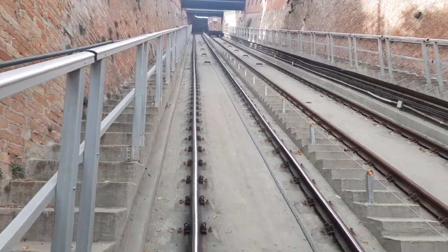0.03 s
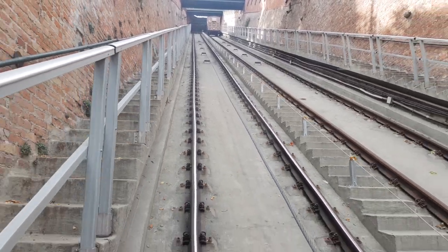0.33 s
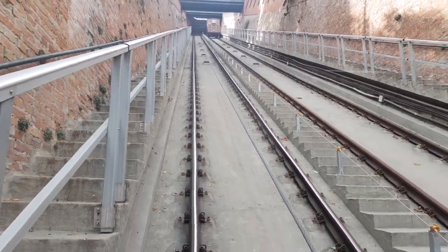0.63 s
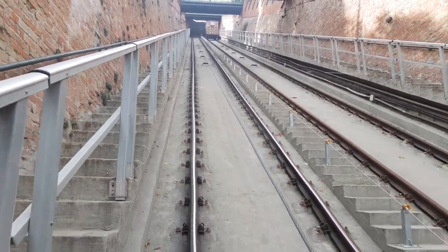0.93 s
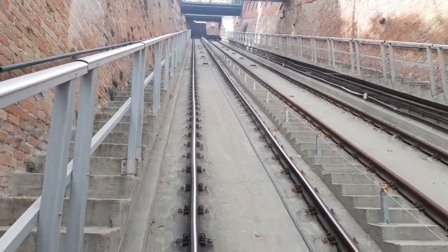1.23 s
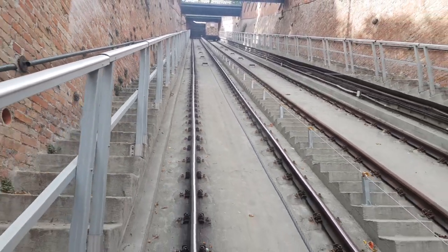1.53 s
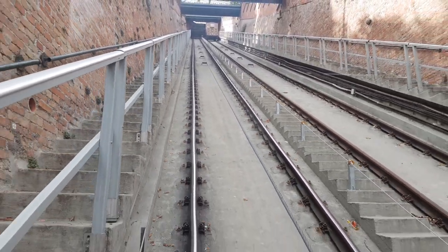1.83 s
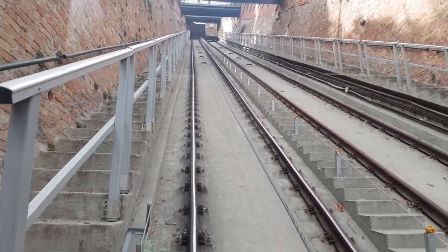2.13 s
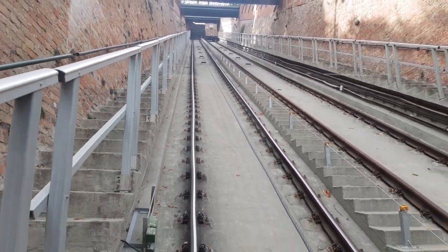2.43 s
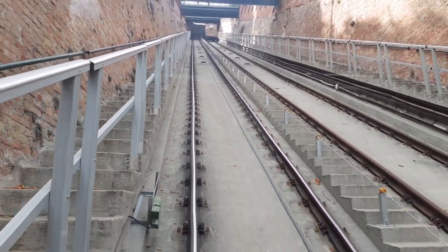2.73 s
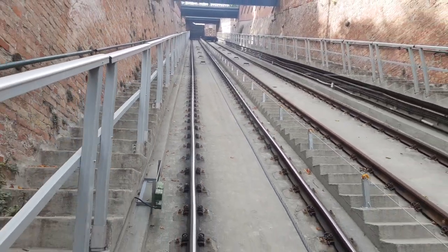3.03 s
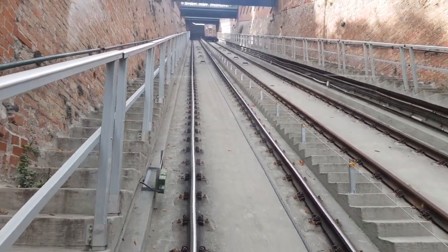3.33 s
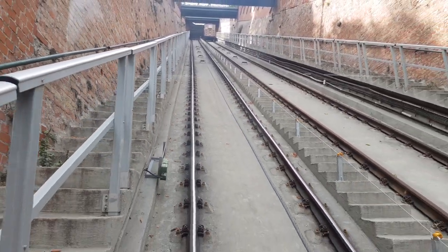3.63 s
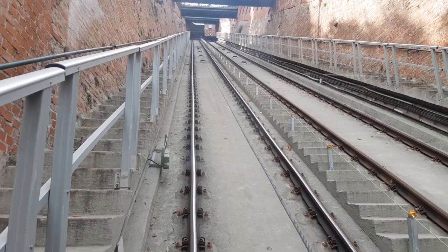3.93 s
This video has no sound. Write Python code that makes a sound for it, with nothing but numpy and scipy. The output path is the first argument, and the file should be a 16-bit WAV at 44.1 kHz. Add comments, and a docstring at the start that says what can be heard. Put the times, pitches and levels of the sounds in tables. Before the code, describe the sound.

Heard from the front of a funicular car climbing outdoors, a low rolling rumble carries on under a faint whine and wheel rush. Bumps, knocks and light scuffs bunch up early, ease, then return, with tiny ticks of grit.

```python
"""A funicular car rolls steadily up an open brick cutting, heard from its front.
From the start, uneven rail makes the body boom under a rush of rolling steel and a faint machine whine.
Bumps thump and rail joints knock, clustering near 0.5 s with light scuffs and a tick of grit.
The boom eases after 1 s; grit ticks near 1.7 s. A second cluster of knocks, thumps and scuffs
comes near 2.5 s, and a last few thumps after 3.4 s."""
import sys
import numpy as np
from scipy import signal
from scipy.fft import rfft, irfft
from scipy.io import wavfile

SR = 44100
rng = np.random.default_rng(int(sys.argv[2]) if len(sys.argv) > 2 else 0)


def int16_out(signal):
    """Quantize to a 16-bit WAV file."""
    q = np.round(np.clip(np.atleast_2d(signal).T, -1, 1) * 32767)
    wavfile.write(sys.argv[1], SR, q.astype(np.int16))


N = 176400
T, HZ = np.arange(N) / SR, np.fft.rfftfreq(N, 1 / SR)

# Car body resonances. Each row: centre in Hz, width in Hz, relative level in dB.
BODY_MODES = [(61, 11, -6), (84.3, 12, -1), (94.8, 12, -6), (119, 12, -4), (148.1, 38, -4),
              (174.2, 14.4, -7), (198, 30, -15.5), (241.6, 16.6, -20), (302.7, 29, -20.5)]
# Rumble under the resonances. Each row: frequency in Hz, relative density in dB.
RUMBLE_SPECTRUM = [(12, -50), (28, -17), (42, -1), (60, 10.5), (110, 4.5), (170, -1.5), (230, -11.5),
                   (340, -22), (600, -66.5)]
# Track shaking the body. Each row: time in seconds, deep boom level in dB, upper boom level in dB.
BOOM_LEVELS = [(0.0, -22, -25), (0.13, -14.5, -19.5), (0.21, -24, -28), (0.3, -20, -24.5),
               (0.35, -25.5, -26.5), (0.45, -15, -20.5), (0.5, -15, -25.5), (0.6, -15, -22.5),
               (0.73, -22.5, -26), (0.86, -19.5, -25.5), (0.96, -19, -29), (1.01, -27, -30),
               (1.1, -22.5, -23.5), (1.15, -25.5, -28.5), (1.23, -24.5, -23), (1.5, -27.5, -27),
               (1.7, -26, -29.5), (1.76, -20.5, -23), (1.85, -24, -22.5), (1.98, -15.5, -23.5),
               (2.11, -24, -31), (2.22, -21.5, -25.5), (2.33, -27.5, -31), (2.38, -20, -24),
               (2.43, -18, -21), (2.465, -22, -22.5), (2.54, -13.5, -24.5), (2.59, -21, -28.5),
               (2.8, -23, -23), (3.05, -19.5, -28), (3.33, -21, -27.5), (3.39, -27.5, -30),
               (3.43, -18, -22.5), (3.48, -17.5, -32), (3.54, -22, -24.5), (3.63, -23, -23),
               (3.7, -20.5, -33), (3.76, -19, -26), (3.82, -24, -30.5), (3.98, -21, -25.5)]
# Wheel rush. Each row: frequency in Hz, left and right relative density in dB.
RUSH_SPECTRUM = [(100, -58.5, -60), (250, -59.5, -65.5), (353, -66.5, -70.5), (463, -62.5, -67.5),
                 (554, -61.5, -61), (600, -64.5, -67), (708, -68.5, -67.5), (933, -72, -75),
                 (1020, -66.5, -74.5), (1160, -70.5, -74.5), (1330, -74.5, -74), (1620, -71, -77),
                 (1740, -78, -73), (1860, -73.5, -75.5), (2260, -78, -76.5), (2800, -83, -82),
                 (4060, -88, -90.5), (5200, -92.5, -94.5), (6200, -94, -99), (7140, -97, -107),
                 (7940, -103.5, -114), (10300, -103.5, -106), (11600, -107, -100.5), (15500, -110, -108)]
# Likeness of the rush's two sides. Each row: frequency in Hz, correlation from -1 to 1.
RUSH_CORRELATION = [(150, 0), (300, 0.63), (430, 0.6), (560, 0.58), (700, 0.7), (830, .25), (980, 0.7),
                    (1150, -.1), (1600, -.45), (2000, 0), (3000, 0), (15000, 0.05)]
# Rush below the hiss band. Each row: time in seconds, gain in dB.
RUSH_GAIN = [(0, 2), (.5, 1), (.72, -0.5), (.9, 0.9), (1.1, -0.5), (1.55, -1), (1.9, 0.5), (2.25, -.8),
             (2.5, 1), (2.9, 0), (3.35, 0), (3.65, 0.7), (4, -0.4)]
# Hiss at the top of the rush. Each row: time in seconds, gain in dB.
HISS_GAIN = [(0, 1.5), (.36, -0.5), (.56, 1), (.75, -1), (.92, 1), (1.2, -2), (1.6, -2.3), (1.8, .3),
             (1.96, -0.5), (2.25, -1.5), (2.46, .3), (2.8, -1), (3.45, -1.2), (3.6, -.5), (4, 0.5)]
# Machine tones. Each row: pitch in Hz, left and right level in dB, right lag in cycles, rms waver in Hz.
WHINE_TONES = [(348.5, -45, -51.5, 0.067, 0.51), (543.2, -46.5, -47.8, 0, 2.68),
               (704.5, -52.5, -52.5, 0, 6), (965, -56, -63, -0.041, 4.98), (1045, -52, -56, -0.38, 1.4),
               (1251, -53.5, -58.5, -0.21, 0.92), (1908, -64.5, -60.5, .3, 9.3),
               (2160, -63.5, -71.5, 0.29, 2.2), (2320, -62.5, -62, 0.56, 3.6)]
# Swell of the whine. Each row: time in seconds, gain in dB.
WHINE_GAIN = [(0, 2.5), (.6, 2.5), (1.3, 2.5), (1.75, -0.5), (2.3, -1), (2.8, 2.5), (3.3, 1.5), (3.75, 1),
              (4, 2.5)]
# Running gear scuffs. Each row: start in seconds, level in dB, centre in Hz, width in octaves,
# rise in seconds, 60 dB decay in seconds.
GEAR_SCUFFS = [(0.025, -48, 1905, 0.013, 0.19, 1.2), (.405, -34, 700, 0.16, 0.04, .35),
               (.4, -41, 980, 0.26, 0.036, 0.29), (.83, -41, 800, 0.35, 0.048, 0.32),
               (2.42, -68, 11000, .2, 0.15, .3), (2.572, -49, 4000, 0.28, .012, 0.2),
               (2.666, -48, 3400, 0.54, 0.0073, 0.1), (2.565, -31.5, 666, 0.0054, 0.022, 0.31)]
# Wheels at rail joints. Each row: start in seconds, level in dB, 60 dB decay in seconds.
JOINT_KNOCKS = [(0.046, -25, 0.2), (0.41, -25, 0.091), (0.444, -22, .12), (.62, -30.5, .25),
                (1.74, -23.5, 0.11), (2.403, -18.5, 0.082), (2.489, -20.5, 0.12), (2.521, -26.5, 0.12)]
# Colour of a knock. Each row: frequency in Hz, relative density in dB.
KNOCK_SPECTRUM = [(60, -14), (130, -2), (190, 7.5), (250, 6.5), (310, -5), (390, -18), (700, -24.5),
                  (1500, -40), (4000, -70)]
# Wheels at bumps. Each row: crest time in seconds, peak level in dB, pitch in Hz.
BUMP_THUMPS = [(.087, -9, 100), (0.13, -9.5, 106), (0.169, -12, 93), (.317, -16, 115), (0.417, -14, 93),
               (0.473, -5.5, 89), (0.521, -13, 109), (0.567, -5.5, 90), (0.605, -6.5, 99), (.635, -12, 97),
               (0.669, -10.5, 109), (1.124, -11.5, 95), (1.214, -10.5, 130), (1.331, -15.5, 119),
               (1.791, -9.5, 101), (1.954, -11, 101), (2.212, -13, 108), (2.423, -8.5, 121),
               (2.539, -5, 94), (2.565, -9, 96.4), (2.723, -12, 112), (2.774, -10.5, 116),
               (2.846, -12, 118), (2.891, -16, 109), (2.942, -11.5, 109), (3.478, -10.5, 102),
               (3.588, -10, 107), (3.635, -10, 102), (3.746, -9, 93)]
# Grit on the rail. Each row: start in seconds, level in dB, centre in Hz, 60 dB decay in seconds.
GRIT_TICKS = [(.552, -58, 10500, 0.082), (1.6245, -55.5, 11000, .034), (1.685, -61, 11500, .04),
              (1.736, -50.7, 11500, .027), (2.316, -59, 13100, .07), (2.668, -61, 10800, .09)]


def amp(db):
    """Decibels to gain."""
    return 10 ** (np.asarray(db) / 20)


def unit(x):
    """Scale to rms 1."""
    return x / np.sqrt(np.mean(x ** 2) + 1e-30)


def over_time(rows, column=1):
    """Table column interpolated over time."""
    table = np.transpose(rows)
    return np.interp(T, table[0], table[column])


def over_pitch(rows, column=1):
    """Table column interpolated over log frequency."""
    table = np.transpose(rows)
    return np.interp(np.log(HZ + 1), np.log(table[0] + 1), table[column])


def noise(spectrum):
    """Shaped noise, rms 1."""
    return unit(irfft(rfft(rng.standard_normal(N)) * spectrum, N))


def drift(rate_hz):
    """Slow random wander, rms 1."""
    return noise(np.exp(-(HZ / rate_hz) ** 2))


def band(centre_hz, octaves):
    """Bell-shaped spectrum."""
    return np.exp(-.5 * (np.log2((HZ + 1) / centre_hz) / octaves) ** 2)


def burst(start_s, rise_s, t60_s):
    """Linear rise, exponential decay."""
    age_s = T - start_s
    return np.clip(age_s / rise_s, 0, 1) * amp(-60 * np.maximum(age_s - rise_s, 0) / t60_s)


def steadied(x, window_s, share):
    """Noise with a share of its chance swells removed, rms 1."""
    power = irfft(rfft(x ** 2) * np.exp(-(HZ * window_s) ** 2), N)
    return unit(x / np.maximum(power, 1e-4) ** (share / 2))


def body_boom(rumble_db=-6, split_hz=136, deep_db=0.05, upper_db=-1.46):
    """Rail roughness drives the body's resonances. Returns the deep and upper bands."""
    modes = sum(amp(db) * noise(1 / (1 + ((HZ - hz) / (width_hz / 2)) ** 2))
                for hz, width_hz, db in BODY_MODES)
    body = unit(modes) + amp(rumble_db) * noise(amp(over_pitch(RUMBLE_SPECTRUM)))
    low = irfft(rfft(body) / (1 + (HZ / split_hz) ** 10), N)
    deep = steadied(low, window_s=.09, share=.75) * amp(deep_db + over_time(BOOM_LEVELS, 1))
    upper = steadied(body - low, window_s=.09, share=.75) * amp(upper_db + over_time(BOOM_LEVELS, 2))
    return deep, upper


def wheel_rush(level_db=-33.5, ripple_db=2.5, ripple_step_hz=23.71, flutter_db=0.65, hiss_hz=8000):
    """Steel rolling on steel, combed into narrow fixed peaks by nearby reflections."""
    left, independent = rfft(rng.standard_normal((2, N)))
    correlation = over_pitch(RUSH_CORRELATION)
    right = correlation * left + np.sqrt(1 - correlation ** 2) * independent
    knots_hz = np.arange(1500) * ripple_step_hz
    ripple = np.array([np.interp(HZ, knots_hz, row) for row in rng.standard_normal((2, len(knots_hz)))])
    colour_db = np.array([over_pitch(RUSH_SPECTRUM, side) for side in (1, 2)]) + ripple_db * ripple
    rush = unit(irfft(np.array([left, right]) * amp(colour_db), N))
    hiss = irfft(rfft(rush) * (HZ > hiss_hz), N)
    swell = amp(over_time(RUSH_GAIN) + flutter_db * drift(rate_hz=24))
    return amp(level_db) * ((rush - hiss) * swell + hiss * amp(over_time(HISS_GAIN)))


def machine_whine(waver_db=1.5, waver_rate_hz=6.2):
    """Steady machine tones, wavering slightly in pitch and level."""
    out = np.zeros((2, N))
    for hz, left_db, right_db, lag_cycles, waver_hz in WHINE_TONES:
        cycles = np.cumsum(hz + waver_hz * drift(waver_rate_hz)) / SR + rng.random()
        tone = np.sin(2 * np.pi * (cycles - np.array([[0], [lag_cycles]])))
        out += amp([[left_db], [right_db]]) * unit(tone * amp(waver_db * drift(waver_rate_hz)))
    return out * amp(over_time(WHINE_GAIN))


def gear_scuffs():
    """Running gear rubs briefly: a hiss when wide-band, a faint ring when narrow."""
    out = np.zeros((2, N))
    for start_s, db, hz, octaves, rise_s, t60_s in GEAR_SCUFFS:
        rub = np.array([steadied(noise(band(hz, octaves)), window_s=.045, share=.93) for _ in range(2)])
        out += amp(db) * burst(start_s, rise_s, t60_s) * rub
    return out


def joint_knocks(rise_s=0.0074):
    """Wheels strike rail joints: dull noise bursts."""
    blows = sum(amp(db) * burst(start_s, rise_s, t60_s) for start_s, db, t60_s in JOINT_KNOCKS)
    return blows * steadied(noise(amp(over_pitch(KNOCK_SPECTRUM))), window_s=.024, share=.9)


def bump_thumps(boom, rise_s=0.011, sharpness=3.34, takeover=.85):
    """Boom with jolts: each bump ducks it and swings the body for two or three cycles."""
    for crest_s, db, hz in BUMP_THUMPS:
        age = np.maximum(1 + (T - crest_s) / rise_s, 0)  # 1 at the crest
        swing = (age * np.exp(1 - age)) ** sharpness
        thump = amp(db) * swing * np.sin(2 * np.pi * (hz * T + rng.random()))
        boom = boom * (1 - takeover * swing) + thump
    return boom


def grit_ticks(octaves=.35, rise_s=.001):
    """Grit snaps on the rail: tiny bright bursts, slightly to the right."""
    out = np.zeros((2, N))
    for start_s, db, hz, t60_s in GRIT_TICKS:
        snap = np.array([noise(band(hz, octaves)) for _ in range(2)])
        out += amp(db) * burst(start_s, rise_s, t60_s) * snap
    return out * amp([[-1], [1]])


def scene():
    """Stereo mix at the front of the car, body slightly to the left."""
    deep, upper = body_boom()
    body = (upper + joint_knocks() + bump_thumps(deep)) * amp([[1], [-1]])
    return body + wheel_rush() + machine_whine() + grit_ticks() + gear_scuffs()


def record(dry):
    """Soft ends, then a low-pass."""
    fade_s, cutoff_hz = .012, 15750
    ends = np.sin(np.pi / 2 * np.minimum(np.minimum(T, T[::-1]) / fade_s, 1))
    lowpass = signal.firwin(511, cutoff_hz, window=("kaiser", 9), fs=SR)
    return signal.oaconvolve(dry * ends, lowpass[None], "same")


dry = scene()
out = record(dry)
int16_out(out)
```